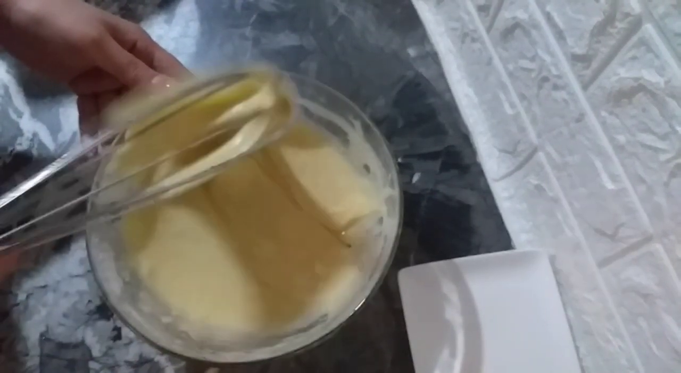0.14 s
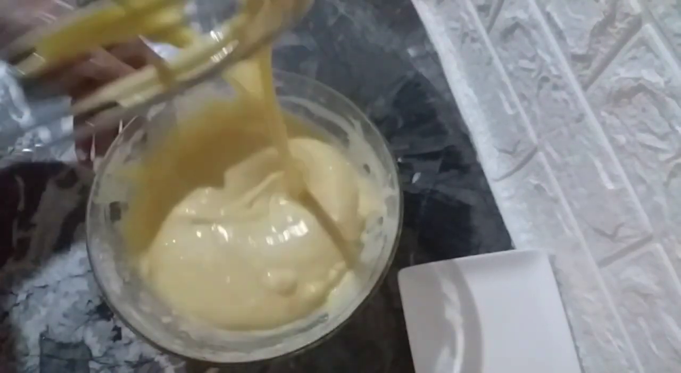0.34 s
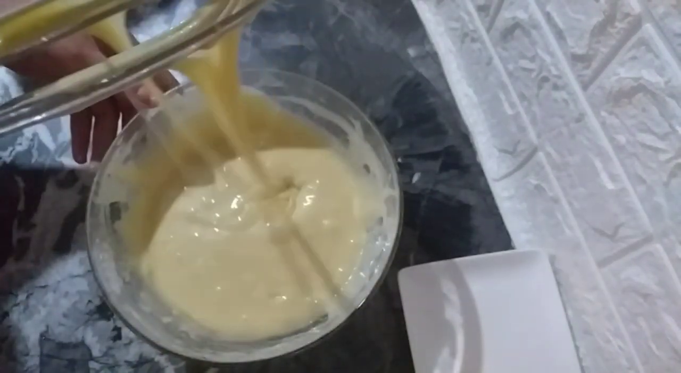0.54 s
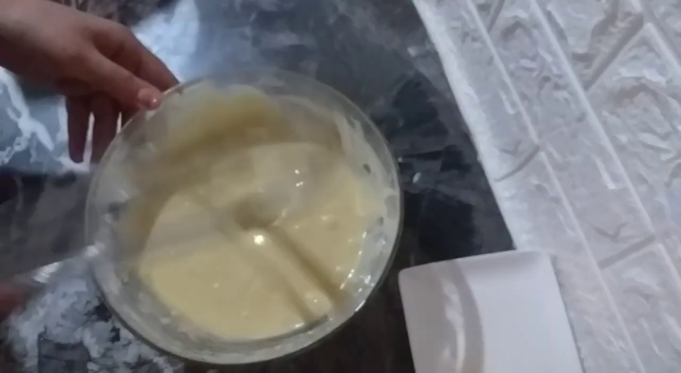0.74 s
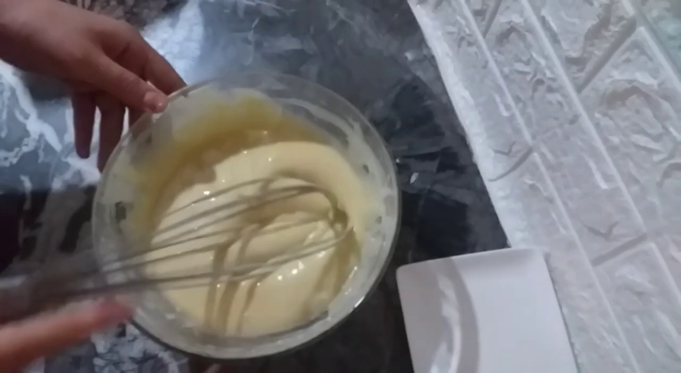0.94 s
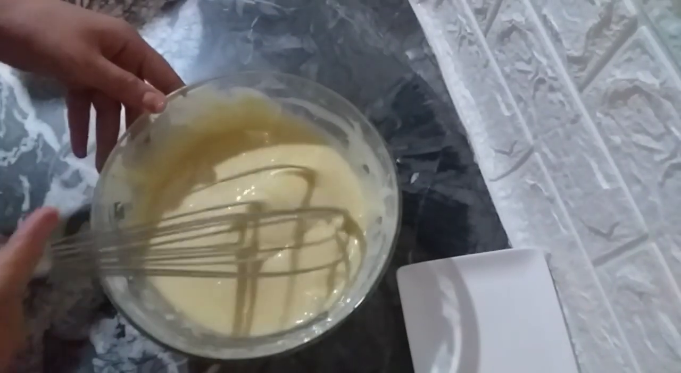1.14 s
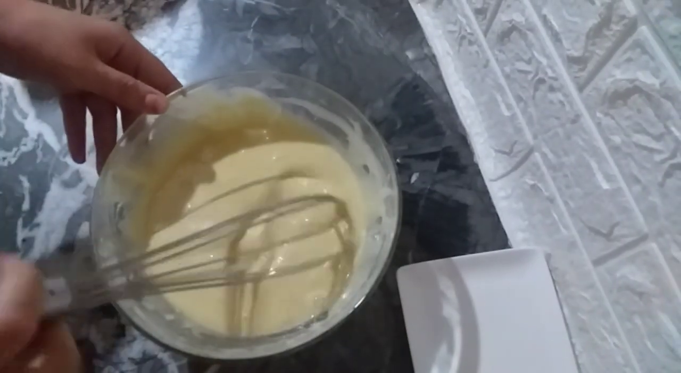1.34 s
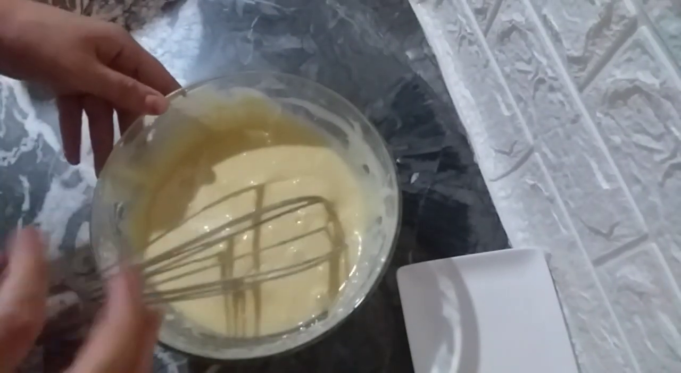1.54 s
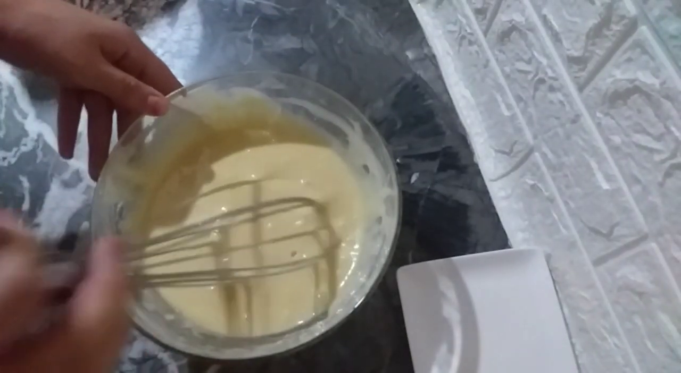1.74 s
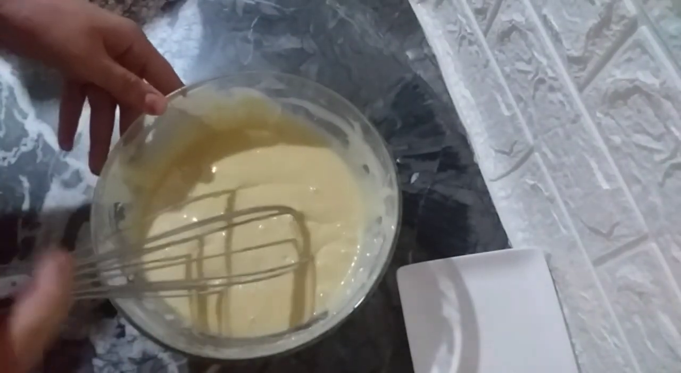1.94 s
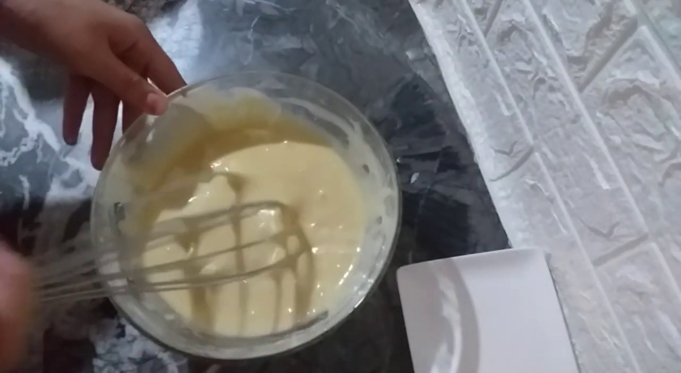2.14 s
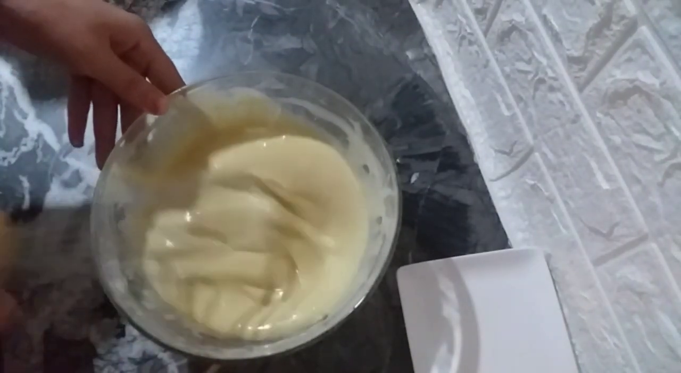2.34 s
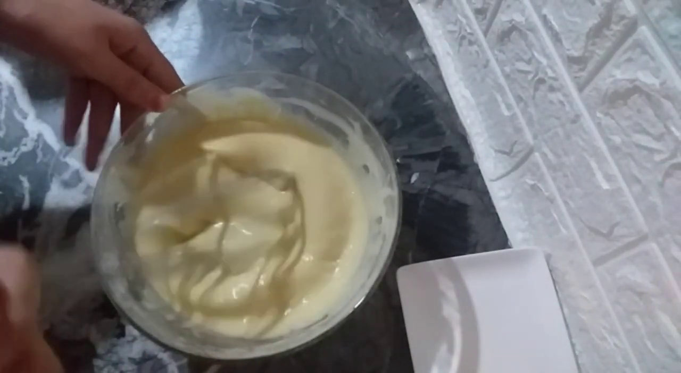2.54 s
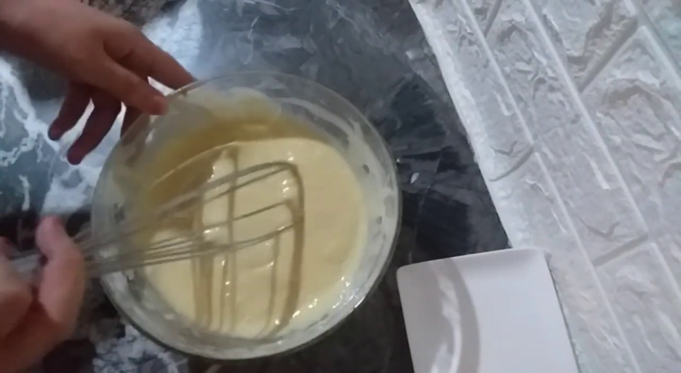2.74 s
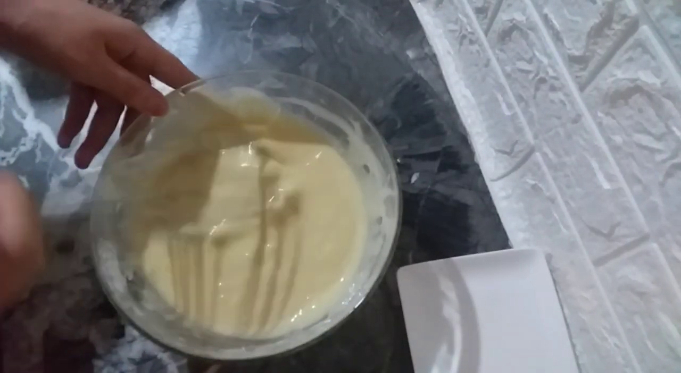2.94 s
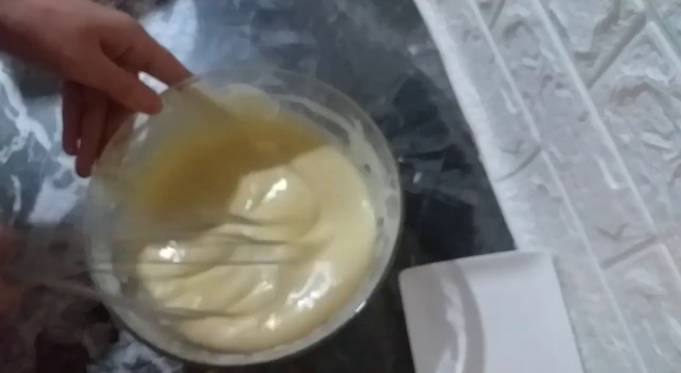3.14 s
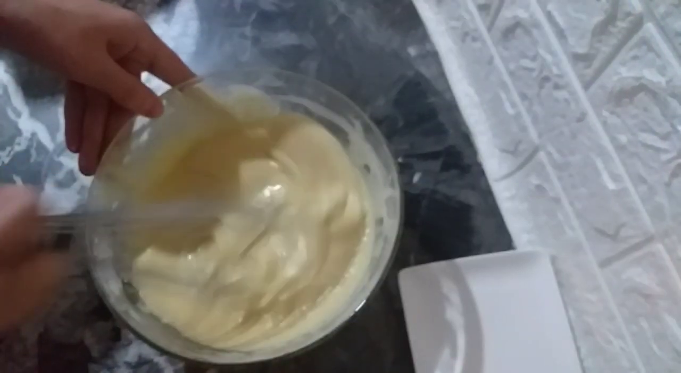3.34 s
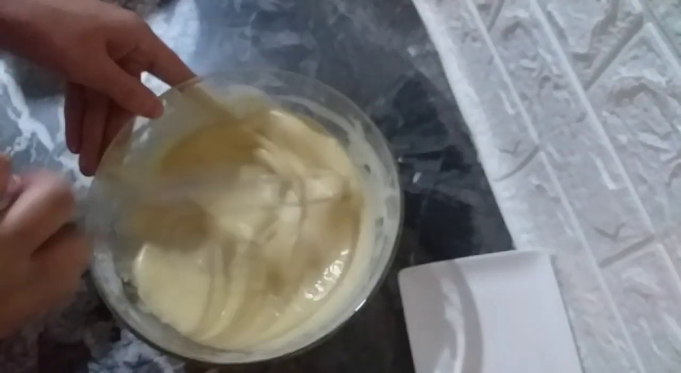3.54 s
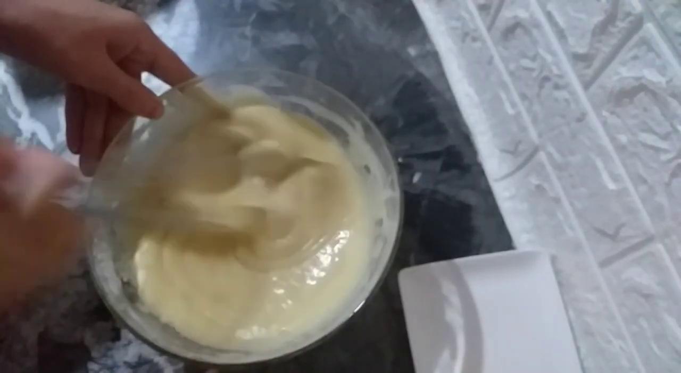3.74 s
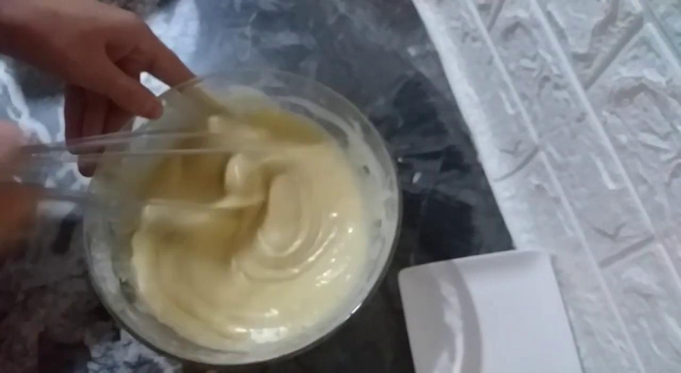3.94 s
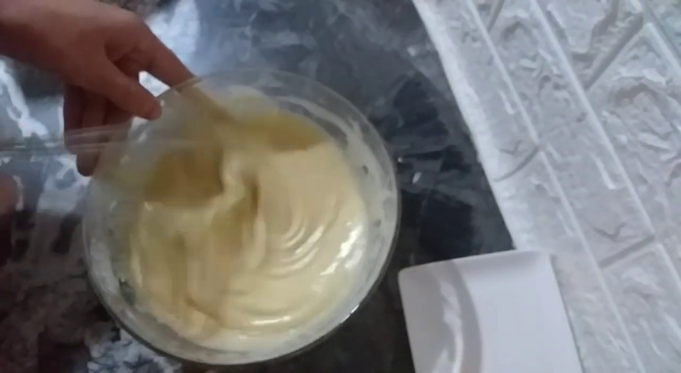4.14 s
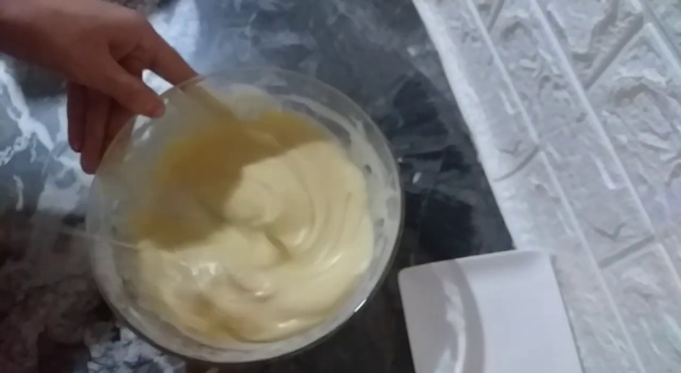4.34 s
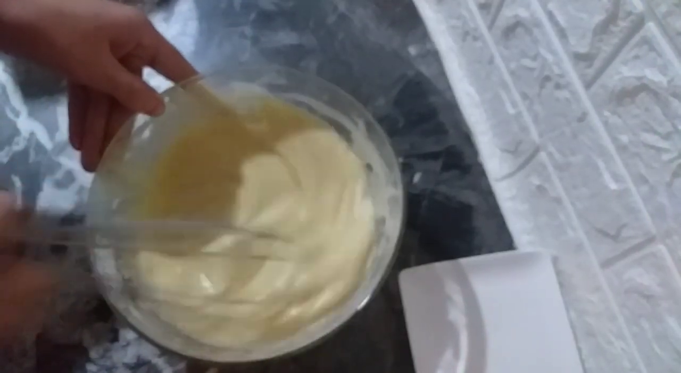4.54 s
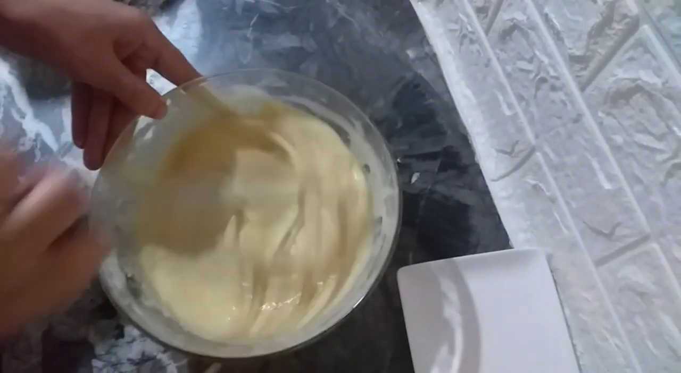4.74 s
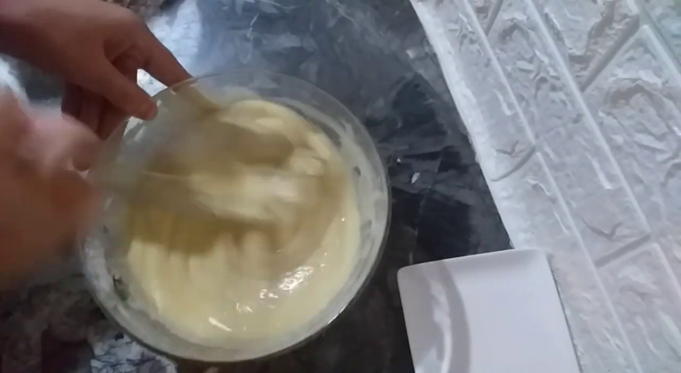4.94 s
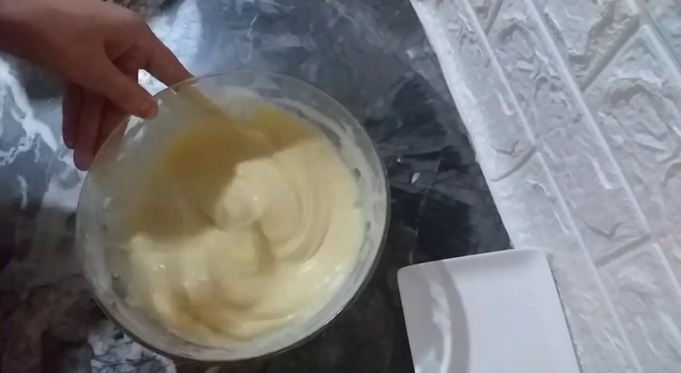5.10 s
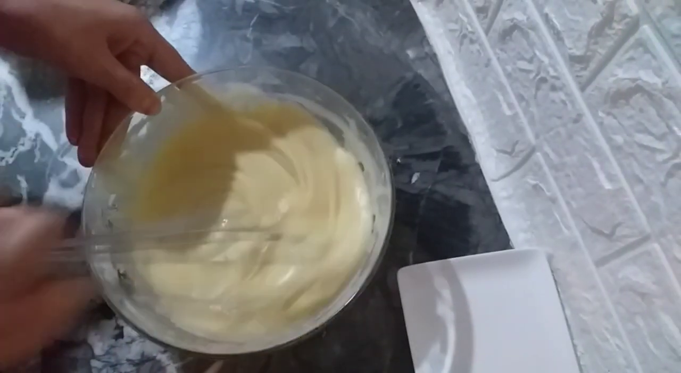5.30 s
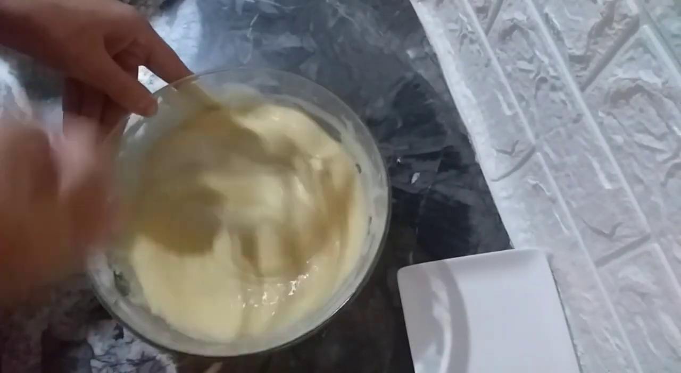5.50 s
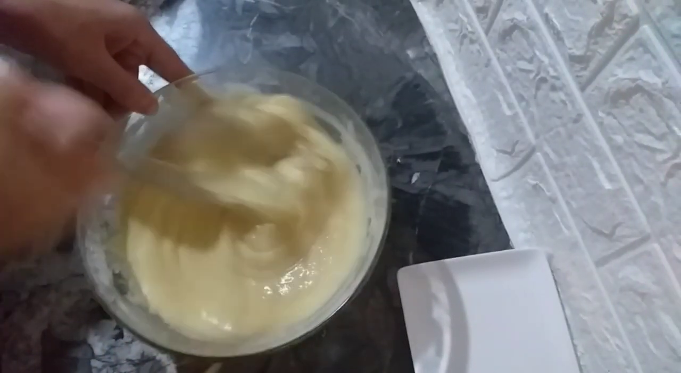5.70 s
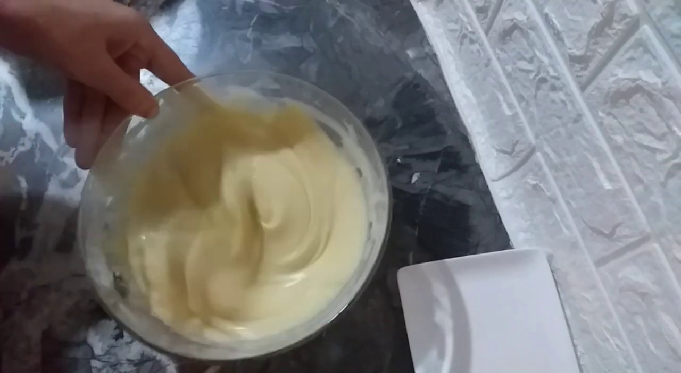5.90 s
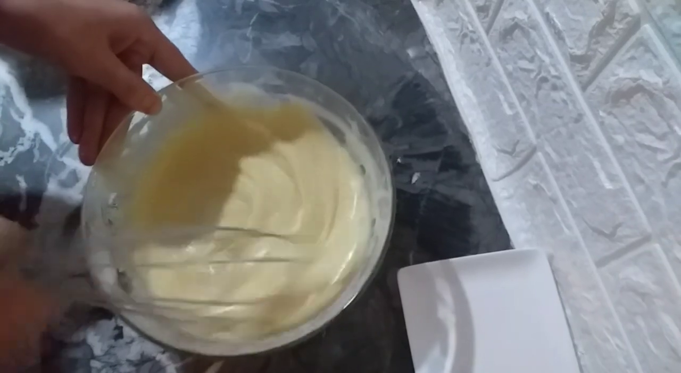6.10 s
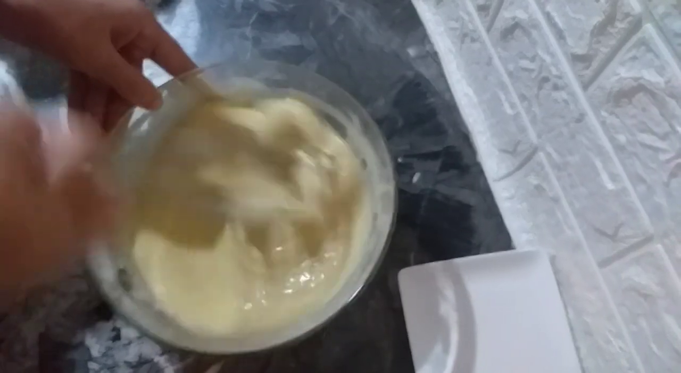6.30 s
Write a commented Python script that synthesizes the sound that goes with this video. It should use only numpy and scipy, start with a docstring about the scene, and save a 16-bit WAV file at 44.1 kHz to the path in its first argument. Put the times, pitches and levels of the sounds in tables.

```python
"""A wire whisk beats thick batter in a glass bowl on a stone counter, close under a phone.
Noise bursts and short-lived modes make the wires' clatter; rim strikes drive ringing glass modes,
and damped low tones make the bowl's knocks on the counter. Shaped noise makes the batter's slosh
and scrape and the kitchen's murmur; a fridge hums in sines and small birds chirp outside in glides."""
import sys
import numpy as np
from scipy import signal
from scipy.fft import rfft, irfft
from scipy.io import wavfile
from scipy.ndimage import uniform_filter1d

SR = 44100
rng = np.random.default_rng(int(sys.argv[2]) if len(sys.argv) > 2 else 0)


def master_out(mix):
    """Clip the mix to full scale and print it as 16-bit PCM to the path in sys.argv[1]."""
    frames = np.transpose(np.atleast_2d(mix))
    ceiling = np.clip(frames, -1, 1)
    pcm = np.round(ceiling * 32767).astype(np.int16)
    wavfile.write(sys.argv[1], SR, pcm)


def to_linear_factor(level_db):
    """Convert decibel levels (scalar or array-like) to linear amplitude factors."""
    exponent = np.asarray(level_db, float) / 20
    return 10 ** exponent


N = 280476
T = np.arange(N) / SR

# colour of wire clatter: pitch_hz, level_db (per Hz)
CLATTER_COLOUR = [(1800, -28), (3000, -2.5), (4500, -0.5), (6000, 1), (7500, 3), (8600, -2.5), (9400, -27)]
# colour of the clatter's top edge: pitch_hz, level_db (per Hz)
EDGE_COLOUR = [(8600, -0.5), (10500, 0.5), (13500, -1.5), (15300, -5.5), (16000, -7.5)]


def colour(x, points):
    """Filter by (Hz, dB) points, 70 dB down outside them."""
    hz, db = np.transpose(points)
    f = np.arange(x.shape[-1] // 2 + 1) * SR / x.shape[-1] + 1
    gain = to_linear_factor(np.interp(np.log(f), np.log(hz), db, -70, -70))
    return irfft(rfft(x) * gain, x.shape[-1])


def band(x, lo_hz, hi_hz):
    """Steep band-pass."""
    return signal.sosfilt(signal.butter(3, [lo_hz, hi_hz], "band", fs=SR, output="sos"), x)


def unit(x):
    """Scale to rms 1."""
    return x / np.sqrt(np.mean(x ** 2))


def peak(x):
    """Scale to peak 1."""
    return x / np.max(np.abs(x))


def fade(t, t60):
    """Exponential decay by 60 dB in t60 seconds, never faster than 8 ms."""
    return np.exp(-np.log(1000) * t / np.maximum(t60, .008))


def walk(rate):
    """Random levels held 1 / rate s and slewed twice."""
    k = int(SR / rate)
    held = np.repeat(rng.standard_normal(N // k + 1), k)
    return 1.7 * uniform_filter1d(uniform_filter1d(held, k), k)[:N]


def add(out, x, s):
    """Mix a short sound in at time s."""
    i = int(s * SR)
    out[i:i + len(x)] += x[:N - i]


def ring(modes, t, chance, scatter_db, detune):
    """Modes of a struck body; each contact point weights and detunes them anew."""
    hz, db, t60 = (c[:, None] for c in np.transpose(modes))
    a, b = chance[:len(modes), None], chance[-len(modes):, None]
    level = to_linear_factor(db + scatter_db * a)
    tone = np.sin(2 * np.pi * hz * (1 + detune * b) * t)
    return np.sum(level * fade(t, t60) * tone, axis=0)


def tail(x, t60, db):
    """Diffuse echo: decaying noise that loses its treble."""
    t = T[:SR // 2]
    echo = rng.standard_normal((2, len(t)))
    dull = signal.lfilter([.3], [1, -.7], echo[0])
    echo = unit(dull * fade(t, t60) + .5 * echo[1] * fade(t, 0.59 * t60))
    echo = echo * np.minimum(t / 0.0099, 1)
    return x + to_linear_factor(db) * signal.fftconvolve(x, echo)[:N] / np.sqrt(len(t))


def kitchen_noise():
    """Coloured noise split into rumble, middle, hiss and treble, evened in level and wavering alone."""
    # colour of the kitchen: pitch_hz, level_db (per Hz)
    bed_colour = [(105, -14), (125, -12), (170, -3), (250, 0.5), (315, 3), (400, -1.5), (600, -11.5),
                  (760, -29.5), (900, -30.5), (1250, -37), (1750, -29), (2450, -20), (2950, -25),
                  (4000, -21.5), (5100, -24.5), (6000, -27.5), (8300, -41.5), (9200, -53.5), (15900, -49)]
    # steady coloured bands: centre_hz, width_hz, level_db (added to the noise already in the band)
    bands = [(318, 38, -3.5), (2630, 170, -5.5), (3400, 250, -4), (5080, 1200, -4.5)]
    # borders of the four parts: edge_hz
    edges_hz = [110, 820, 1550, 8800, 15900]
    noise = colour(rng.standard_normal(N), bed_colour)
    noise = noise + sum(to_linear_factor(db) * band(noise, hz - width / 2, hz + width / 2) for hz, width, db in bands)
    return [to_linear_factor(0.9 * walk(8.2)) * unit(band(noise, lo, hi)) for lo, hi in zip(edges_hz, edges_hz[1:])]


def bed():
    """The kitchen's murmur: four noise bands; the treble follows the hiss and rustles now and then."""
    # background levels: time_s, rumble_db, middle_db, hiss_db
    background = [(0, -57.5, -59, -56.5), (.2, -69, -82, -67.5), (.42, -67, -76, -61.5),
                  (.64, -68.5, -72, -62.5), (.83, -67.5, -73, -67), (.97, -71.5, -82, -67),
                  (1.17, -57, -60.5, -57), (1.4, -49, -57, -54), (1.54, -51, -59.5, -55),
                  (1.7, -56.5, -67.5, -61.5), (2.2, -54.5, -65, -60.5), (2.6, -58, -66, -58),
                  (2.96, -55.5, -70.5, -64), (3.2, -61, -56, -52), (4.0, -55.5, -68.5, -64.5),
                  (6.36, -57, -63, -64)]
    # brief rustles in the top treble: start_s, length_s, level_db
    rustles = [(.76, 0.2, -73), (1.04, 0.15, -64), (1.32, 0.1, -59), (1.936, 0.069, -64), (2.384, 0.2, -61),
               (2.666, 0.067, -68)]
    treble_below_hiss_db = -6.5
    s, low_db, middle_db, hiss_db = np.transpose(background)
    levels_db = (low_db, middle_db, hiss_db, hiss_db + treble_below_hiss_db)
    levels = [to_linear_factor(np.interp(T, s, db)) for db in levels_db]
    for start, length, db in rustles:
        add(levels[3], to_linear_factor(db) * np.hanning(int(length * SR)), start)
    return sum(level * noise for level, noise in zip(levels, kitchen_noise()))


def fridge():
    """Compressor shaft line that wavers, a line at its double and a soft rumble around the double."""
    # fridge levels: time_s, shaft_db, double_db
    hum = [(0, -63, -56.5), (1.03, -67.5, -57), (1.18, -60, -52), (1.6, -60, -51), (2.6, -58, -50),
           (6.36, -59.5, -50.5)]
    shaft_hz = 48.7
    s, shaft_db, double_db = np.transpose(hum)
    phase = 2 * np.pi * shaft_hz * T
    shaft = to_linear_factor(np.interp(T, s, shaft_db) + 0.37 * walk(5.5)) * np.sin(phase)
    rumble = to_linear_factor(-14.5) * unit(band(rng.standard_normal(N), 78.0, 128.5))
    double = to_linear_factor(np.interp(T, s, double_db)) * (np.sin(2 * phase) + rumble)
    return np.sqrt(2) * (shaft + double)


def bowl():
    """Soft, slow pushes: a damped low tone, upper bowl modes and some wet noise."""
    # bowl and batter thumping: start_s, peak_db (low part), pitch_hz, upper_db (bowl modes, relative)
    thumps = [(0.0014, -36.5, 125, -16), (2.3, -20.5, 339, -8.5), (2.531, -16, 319, -22),
              (2.757, -37.5, 308, -22), (2.909, -43, 317, -21), (3.005, -42.5, 383, -16),
              (3.025, -35.5, 391, -8), (3.229, -39.5, 293, -8), (3.279, -33, 360, -10),
              (3.347, -46, 347, -12), (3.406, -42, 237, -5), (3.483, -30, 312, -12), (3.522, -32, 262, -4),
              (3.574, -36.5, 346, -15), (3.652, -42, 404, -9), (3.692, -39, 410, -12),
              (3.733, -32, 318, -12), (3.808, -36, 364, -11.5), (3.932, -43, 306, -14),
              (3.986, -30.5, 357, -13), (4.099, -36.5, 239, -20), (4.13, -35.5, 384, -9),
              (4.186, -26.5, 314, -11), (4.25, -28.5, 308, -17.5), (4.326, -33, 371, -21),
              (4.437, -27.5, 296, -19), (4.508, -28.5, 360, -12.5), (4.626, -36, 410, -17),
              (4.671, -30, 323, -12.5), (4.754, -34, 389, -13), (4.88, -39, 417, -14),
              (4.942, -35, 298, -11), (4.998, -30, 326, -15), (5.134, -35.5, 257, -22),
              (5.18, -30, 287, -15), (5.26, -31.5, 264, -14), (5.404, -33, 409, -18),
              (5.451, -28.5, 252, -12), (5.539, -27, 395, -17.5), (5.675, -31.5, 318, -17),
              (5.739, -32.5, 318, -14), (5.799, -30, 336, -16), (5.941, -28, 298, -17),
              (5.987, -31, 266, -12), (6.039, -35.5, 246, -17), (6.077, -26, 408, -14),
              (6.212, -31, 256, -14), (6.254, -36, 272, -10), (6.3, -32, 238, -17)]
    # loaded bowl on the counter: pitch_hz, level_db, t60_s
    bowl_modes = [(789, -5, 0.13), (873, 1, 0.063), (1106, -8, 0.087), (1267, -3, 0.048), (1398, -3, 0.079)]
    thump_t60_s = 0.072
    out, t = np.zeros(N), T[:6144]
    rise = 1 - np.exp(-t / 0.002)
    for s, db, hz, upper_db in thumps:
        tone = np.sin(2 * np.pi * hz * t + 2 * np.pi * rng.random())
        wet = unit(band(rng.standard_normal(len(t)), 0.41 * hz, 1.31 * hz))
        upper = to_linear_factor(upper_db) * ring(bowl_modes, t, rng.standard_normal(20), 2.5, 0.012)
        low = peak(rise * fade(t, thump_t60_s) * (tone + 0.62 * wet))
        add(out, to_linear_factor(db) * (low + upper), s)
    return out


def clicks():
    """Short narrow-band noise ticks, faint, while the whisk is lifted."""
    # clicks: start_s, peak_db, centre_hz
    lifted = [(.299, -42, 6850), (.344, -56, 3550), (.362, -43, 4970), (.394, -54, 10500),
              (.455, -53, 11500), (.491, -47, 6000), (.868, -51, 7000)]
    t60_s, half_width = 0.027, 0.15  # half width as a share of the centre
    out, t = np.zeros(N), T[:2048]
    for s, db, hz in lifted:
        noise = band(rng.standard_normal(len(t)), hz * (1 - half_width), hz * (1 + half_width))
        add(out, to_linear_factor(db) * peak(noise * fade(t, t60_s)), s)
    return out


def clatter(t, t60, bright_hz, edge_db):
    """Burst of several wires: a sharp crack, close followers and a short tail."""
    noise = rng.standard_normal((2, len(t)))
    # one wire lands first, three weaker ones 1 to 7 ms later
    wires = np.zeros(320)
    wires[0] = 1
    wires[rng.integers(40, 320, 3)] = .5 * rng.random(3)
    decay = 1.7 * fade(t, 0.0057) + fade(t, 0.38 * t60) + 0.2 * fade(t, 2.2 * t60)
    shape = signal.lfilter(wires, 1, decay) * np.minimum(t / 0.00023, 1)
    body = unit(colour(noise[0], CLATTER_COLOUR))
    bright = unit(band(body, 0.908 * bright_hz, 1.105 * bright_hz))
    body = unit(body + 0.41 * bright)
    return shape * (body + to_linear_factor(edge_db) * unit(colour(noise[1], EDGE_COLOUR)))


def whisk():
    """Every tick is clatter, a knock through the batter and briefly ringing wire loops."""
    # wires meeting the batter-coated glass: start_s, peak_db (clatter and loops), brightest_hz,
    # knock_db (through the batter, relative to that peak), edge_db (relative to the clatter's body)
    ticks = [(0.4324, -50, 4670, -5, -10), (0.774, -43, 7450, -16, -3), (0.7845, -38, 3900, -9, -6),
             (1.2244, -42, 7250, -2, -10), (1.3468, -40.5, 4590, -5, -6), (2.269, -33, 6510, -18, -10),
             (2.3006, -8.5, 6960, -8.5, -4.5), (2.4079, -39.5, 7400, -17, -6),
             (2.531, -7.5, 7500, -13.5, -8.5), (3.0244, -39, 3740, -3.5, -20), (3.111, -39.5, 7070, -9, -8),
             (3.1383, -42, 6930, -11, -10), (3.1951, -31.5, 6560, -20, -14), (3.2178, -40, 7660, -11, -12),
             (3.2304, -28, 7470, -11.5, -16), (3.264, -31, 6500, -11, -16), (3.2804, -33, 3530, -3.5, -15),
             (3.3144, -39, 6480, -4, -10), (3.455, -29.5, 6640, -3.5, -13), (3.5114, -26, 3910, -5, -9),
             (3.5737, -33, 7770, -8, -5), (3.6951, -26, 6740, -10.5, -17), (3.7324, -29.5, 2660, -8, -16),
             (3.748, -25, 7000, -8, -9), (3.8006, -30.5, 7030, -11, -8), (3.9155, -28.5, 3000, 0, -9),
             (3.9625, -30, 5650, -3, -14), (3.9833, -22, 5900, -9.5, -9), (4.132, -11, 6450, -11.5, -8.5),
             (4.1413, -19.5, 4260, -7.5, -3), (4.1837, -19, 7980, -12, -9), (4.2098, -29.5, 7600, -14, -8),
             (4.2497, -26.5, 5950, -9, -12), (4.376, -18.5, 7440, -9, -8), (4.4257, -21.5, 5460, -4, -5),
             (4.4318, -18, 2780, -8, -12), (4.5094, -32, 2640, -1.5, -13), (4.5324, -43, 7010, -5, -8),
             (4.6259, -12, 7300, -14, -7), (4.6664, -21, 2830, -7, -12), (4.726, -33.5, 5850, -8, -13),
             (4.7562, -28.5, 7000, -3, -19), (4.772, -36, 6300, -13, -6), (4.88, -15, 7070, -16.5, -5.5),
             (4.9203, -24, 7600, -8, -14), (4.936, -33.5, 7850, -4, -10), (4.9597, -35, 7610, -11, -13),
             (4.998, -33, 5920, -10, -12), (5.0063, -25, 6400, -11.5, -7.5),
             (5.134, -11.5, 7600, -13.5, -7.5), (5.174, -16.5, 7600, -10.5, -14),
             (5.197, -23, 7820, -6, -4), (5.228, -23, 6420, -12, -12), (5.2609, -20.5, 4480, -12.5, -11),
             (5.2654, -23.5, 7740, -6, -8), (5.2933, -32.5, 4370, 0.5, -12),
             (5.4044, -11, 7440, -13.5, -10), (5.454, -16.5, 7800, -11.5, -12),
             (5.4872, -26.5, 7300, -12, -10), (5.5383, -18.5, 5840, -14, -20),
             (5.5463, -20.5, 7700, -6.5, -8), (5.674, -3.5, 7550, -23, -7.5),
             (5.7014, -22.5, 5120, -4.5, -8), (5.711, -13.5, 7970, -10.5, -12),
             (5.7677, -24, 7460, -10, -11), (5.7998, -13.5, 7500, -13.5, -14), (5.8326, -36.5, 2590, 6, -9),
             (5.9412, -15, 7340, -7.5, -9), (5.9634, -27, 5870, -15, -10), (5.9825, -18.5, 7700, -5, -13),
             (6.035, -32.5, 6040, -5, -13), (6.0722, -15, 7660, -16, -11), (6.0818, -16.5, 6340, -7, -2.5),
             (6.2119, -10, 8340, -13.5, -5), (6.2529, -14, 7740, -9.5, -7.5),
             (6.3116, -25.5, 7580, -8, -11), (6.342, -16, 7800, -10, -9)]
    # wire loops: pitch_hz, level_db, t60_s
    wire_loops = [(3600, -6, 0.08), (4500, -11, .035), (6400, -4, .04), (6690, -18, 0.031),
                  (6530, -3, 0.0071), (7440, -13, .045), (7400, 9, 0.014), (7800, -3, 0.037)]
    typical_t60_s, t60_scatter = 0.053, .25  # scatter in natural-log units
    out, t = np.zeros(N), T[:4096]
    for (s, db, hz, knock_db, edge_db), a in zip(ticks, rng.standard_normal(len(ticks))):
        t60 = typical_t60_s * np.exp(t60_scatter * a)
        knock = band(rng.standard_normal(len(t)), 662, 2400)
        knock = knock * fade(t, 0.99 * t60) * np.minimum(t / 0.00197, 1)
        loops = to_linear_factor(-14) * ring(wire_loops, t, rng.standard_normal(40), 4, .025)
        wires = clatter(t, t60, hz, edge_db) + loops
        add(out, to_linear_factor(db) * (peak(wires) + to_linear_factor(knock_db) * peak(knock)), s)
    return out


def swish():
    """A brief raspy hiss of grainy noise, brightest near 5 kHz."""
    # swish level: time_s, level_db
    envelope = [(.875, -62), (.895, -46), (.925, -45), (.955, -52), (1.0, -64)]
    # swish colour: pitch_hz, level_db (per Hz)
    swish_colour = [(1000, -45), (1700, -22), (2310, -13.5), (2870, -16), (5010, 0), (6530, -17),
                    (7880, -18), (9000, -25), (11700, -53), (19800, -120)]
    s, db = np.transpose(envelope)
    grainy = rng.standard_normal(N) * to_linear_factor(0.67 * walk(250))
    return to_linear_factor(np.interp(T, s, db, -120, -120)) * unit(colour(grainy, swish_colour))


def birds():
    """Gliding whistles roughened by fast pitch flutter, and faint far hoots, smeared by the yard."""
    # birds outside, one list a call: time_s, pitch_hz (before flutter), level_db
    chirps = [
        [(1.04, 2920, -64), (1.06, 3490, -55), (1.09, 3930, -54), (1.115, 3970, -52), (1.15, 3400, -52),
         (1.18, 2800, -57)],
        [(1.44, 3660, -53), (1.47, 4090, -50), (1.5, 3720, -57), (1.53, 3460, -57)],
        [(1.588, 4190, -50), (1.605, 4340, -40), (1.615, 3960, -39), (1.635, 3810, -46), (1.67, 3480, -59)],
        [(2.79, 3600, -57), (2.82, 3335, -61), (2.86, 3010, -61), (2.91, 3330, -70)],
    ]
    # roughness of each call: 0 whistle, 1 rasp
    roughness = [.16, .3, .12, .35]
    # faint far hoots: start_s, length_s, pitch_hz, level_db
    hoots = [(1.83, .1, 620, -57), (2.12, .14, 570, -59), (2.64, .08, 580, -64)]
    yard_t60_s, yard_db = 0.24, -0.5
    out = np.zeros(N)
    for call, rough in zip(chirps, roughness):
        s, hz, db = np.transpose(call)
        pitch = np.interp(T, s, hz) * (1 + 0.23 * rough * walk(900))
        gate = np.clip(np.minimum(T - s[0], s[-1] - T) / 0.003, 0, 1)
        level = gate * to_linear_factor(np.interp(T, s, db)) * to_linear_factor(1.2 * walk(150))
        out += level * np.sin(2 * np.pi * np.cumsum(pitch) / SR)
    for s, length, hz, db in hoots:
        t = T[:int(length * SR)]
        add(out, to_linear_factor(db) * np.sin(np.pi * t / length) * np.sin(2 * np.pi * hz * t), s)
    return tail(out, yard_t60_s, yard_db)


def stirring():
    """Batter sloshes most halfway round each circuit; wires scrape in tiny ticks that fade along it."""
    # each circuit of the whisk through the batter: start_s, slosh_db, scrape_db
    circuits = [(2.98, -51.5, -59.5), (3.13, -52, -50.5), (3.39, -42, -55.5), (3.63, -39.5, -53),
                (3.85, -40.5, -51.5), (4.08, -51, -56), (4.33, -43, -51.5), (4.58, -50.5, -57),
                (4.85, -49, -61.5), (5.12, -46, -54), (5.36, -60, -54), (5.64, -45.5, -58.5),
                (5.89, -61, -54.5), (6.15, -47.5, -54), (6.4, -45, -55)]
    slosh_dip_db, scrape_dip_db = -17, -2.5  # slosh between circuits, scrape by the circuit's end
    slosh_middle_db, scrape_top_db = -11.5, -5.5  # relative to the slosh's rumble, the scrape's body
    scrapes_per_s = 220  # on average
    s, slosh_db, scrape_db = np.transpose(circuits)
    turn = np.interp(T, s, np.arange(len(s)))
    stroke, slack = turn.astype(int), np.cos(np.pi * turn) ** 2
    on = np.clip((T - s[0]) / 0.023, 0, 1)

    def smooth(db):
        """Level without jumps from circuit to circuit, silent before the first."""
        return on * to_linear_factor(uniform_filter1d(db, 1024))

    low, middle, _, _ = kitchen_noise()
    slosh_level = smooth(slosh_db[stroke] + slosh_dip_db * slack)
    slosh = slosh_level * (low + to_linear_factor(slosh_middle_db) * middle)
    # wires catch at random moments with random force
    force = to_linear_factor(3.5 * np.minimum(rng.exponential(size=N), 3))
    catches = (rng.random(N) < scrapes_per_s / SR) * force
    burst = signal.lfilter([1], [1, -np.exp(-1 / (0.011 * SR))], catches)
    body, top = [unit(burst * colour(rng.standard_normal(N), points))
                 for points in (CLATTER_COLOUR, EDGE_COLOUR)]
    scrape_level = smooth(scrape_db[stroke] + scrape_dip_db * (turn - stroke))
    return slosh + scrape_level * (body + to_linear_factor(scrape_top_db) * top)


def rim():
    """Bare glass rings in split mode pairs while the wire chatters against it for a few milliseconds."""
    # whisk striking the bare rim: start_s, level_db (rms of the first moments), clatter_db,
    # tilt_db (of the modes, per octave about 5 kHz), contact_s
    rim_hits = [(3.1486, -48, 9.5, 3, 0.011), (3.391, -27.5, 9.5, 0.5, 0.012),
                (3.6498, -43.5, -10, -6.5, 0.0049), (3.8683, -24.5, 6, 3, 0.0034),
                (4.0985, -38.5, 22, -16.5, 0.004), (4.3316, -17.5, 8, 2.7, 0.005),
                (4.5802, -22.5, 5.5, 6, 0.0038), (4.8794, -34.5, 18, -3, 0.0055),
                (5.3665, -21.5, 19, -1, 0.0034), (5.904, -19.5, 6.5, 4, 0.0037),
                (6.1747, -35.5, -1, -3.5, 0.0025)]
    # rim of the bowl: pitch_hz, level_db, t60_s
    rim_modes = [(1315, -8, 0.12), (2117, 0.5, 0.066), (3047, 5, 0.069), (4184, 6.5, 0.024),
                 (5537, 6.5, 0.036), (5465, 2, 0.059), (6760, -12, 0.03), (7600, 0, 0.046), (8610, 2, 0.05),
                 (11800, 2, 0.021), (11540, 1.5, 0.016), (12900, -5, 0.029), (14500, -12, 0.022)]
    rattle_db, rattle_t60_s = -19.5, .35  # wires shivering after the strike, relative to clatter_db
    out, t = np.zeros(N), T[:6144]
    for s, db, clatter_db, tilt_db, contact in rim_hits:
        modes = [(hz, mode_db + tilt_db * np.log2(hz / 5000), t60) for hz, mode_db, t60 in rim_modes]
        # the chatter swells quickly and dies over the contact time, in separate bumps
        u = t[:1024] / contact
        chatter = rng.standard_normal(1024) ** 3 * u ** 0.81 * np.exp(-1.7 * u)
        chatter = chatter / np.sqrt(np.sum(chatter ** 2))
        glass = ring(modes, t, rng.standard_normal(40), 2.5, .004)
        glass = glass + .6 * ring(modes, t, rng.standard_normal(40), 4, .02)
        # loose wires keep brushing the rim and break up its ring
        glass = glass * to_linear_factor(3.5 * np.repeat(rng.standard_normal(len(t) // 96), 96))
        body = glass + to_linear_factor(clatter_db) * clatter(t, 0.022, 7730, -6.5)
        rattle = unit(colour(rng.standard_normal(len(t)) ** 3, CLATTER_COLOUR))
        rattle = rattle * fade(t, rattle_t60_s) * np.cos(np.pi / 2 * t / t[-1])
        body = body + to_linear_factor(clatter_db + rattle_db) * rattle
        strike = signal.fftconvolve(body, chatter)[:len(t)]
        # the blow's strength sets the loudness of its first moments
        add(out, to_linear_factor(db) * strike / np.std(strike[:768]), s)
    return out


def scene():
    """Everything arrives from the middle; the bowl's thumps leave a shorter room tail than the wires."""
    wires = band(tail(whisk() + rim() + clicks(), 0.2, -9), 256, 17800)
    thumps = band(tail(bowl(), 0.14, -8), 70, 7400)
    mid = wires + thumps + bed() + stirring() + fridge() + birds() + swish()
    return np.array([mid, mid])


def band_limit(x):
    """A steep low-pass at the top of the band."""
    return signal.sosfilt(signal.butter(12, 16790, fs=SR, output="sos"), x)


def record(dry):
    """The recorder rounds the loudest peaks and cuts the top. Now and then, faint treble patches differ between
    the two channels."""
    top_cut = signal.ellip(8, .2, 70, 16300, fs=SR, output="sos")
    mid = signal.sosfilt(top_cut, np.tanh(1.326 * dry) / 1.485)
    patches = np.clip(walk(12) - .2, 0, 1.5)
    side = to_linear_factor(-11.5) * patches * walk(1500) * mid[0]
    treble = signal.butter(8, [4700, 16000], "band", fs=SR, output="sos")
    side = signal.sosfilt(treble, side)
    return band_limit(mid + side * np.array([[1], [-1]]))


dry = scene()
out = record(dry)
master_out(out)
```